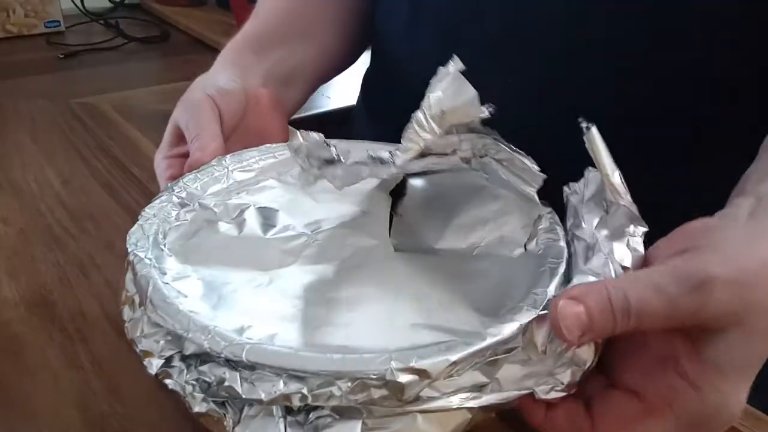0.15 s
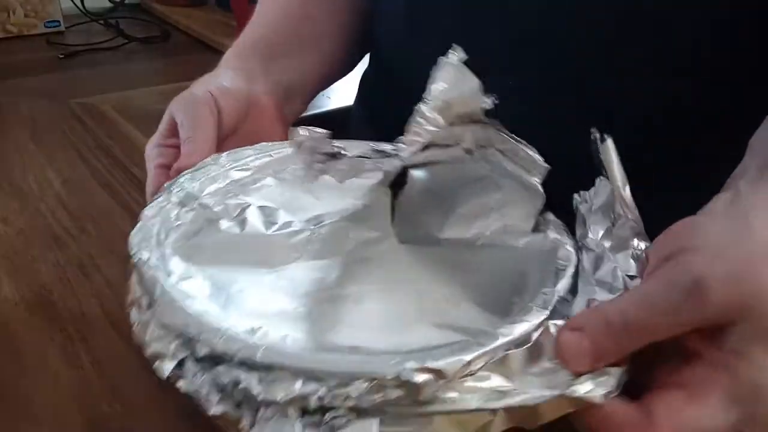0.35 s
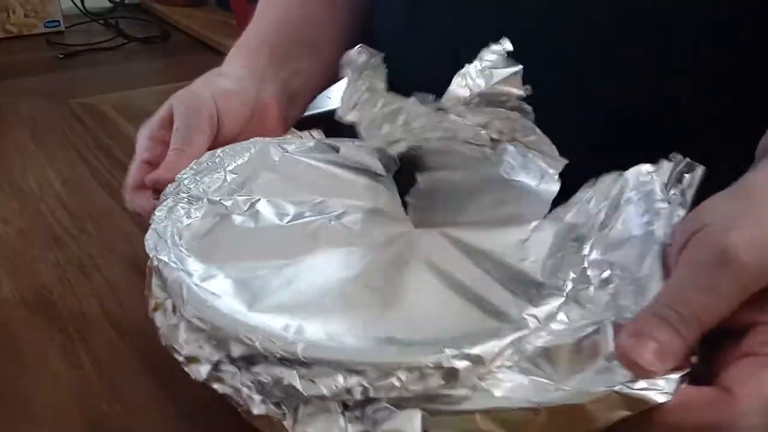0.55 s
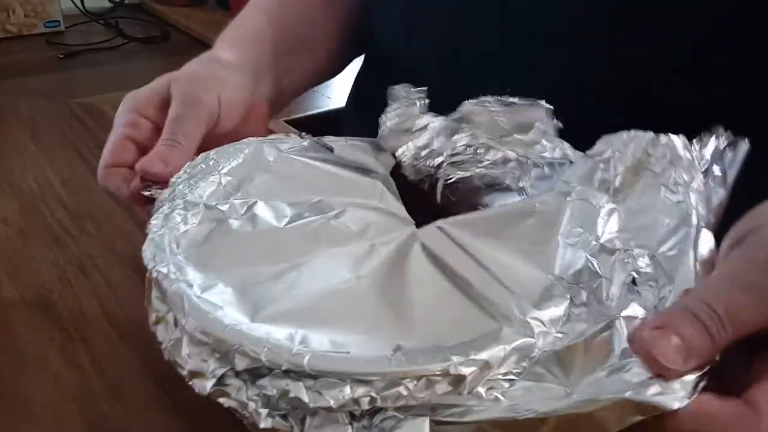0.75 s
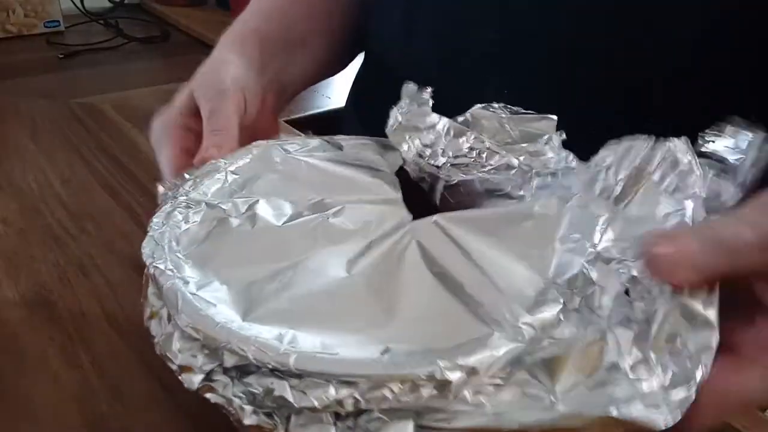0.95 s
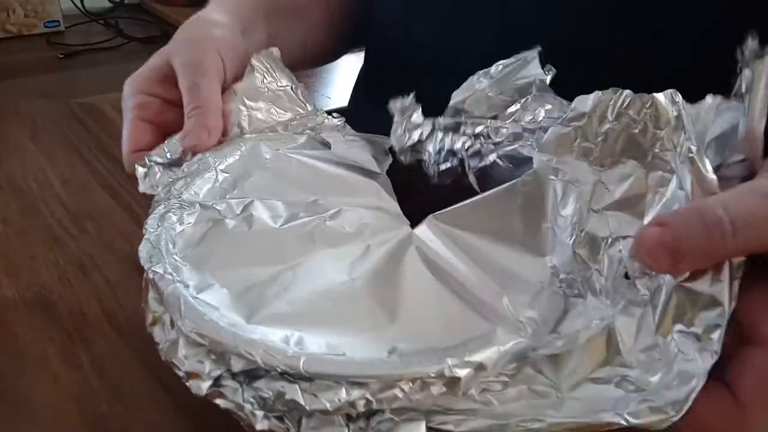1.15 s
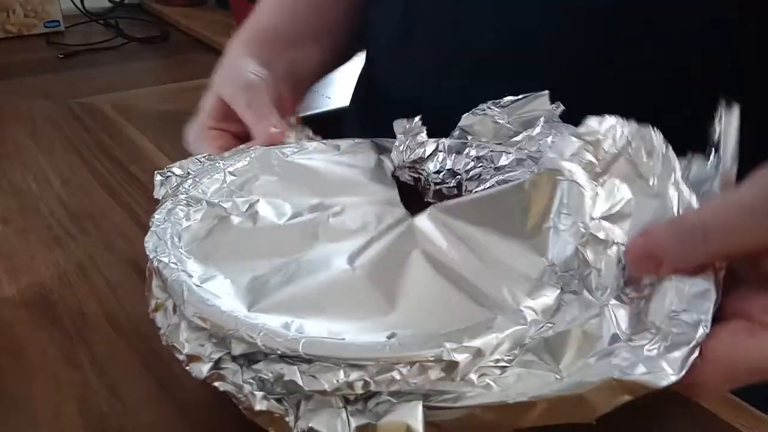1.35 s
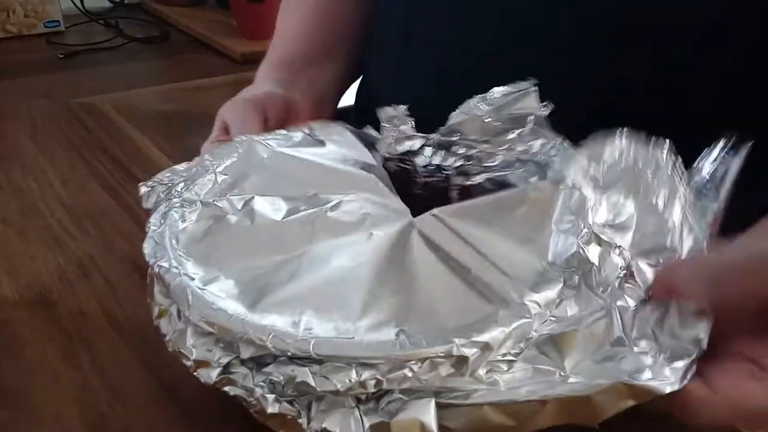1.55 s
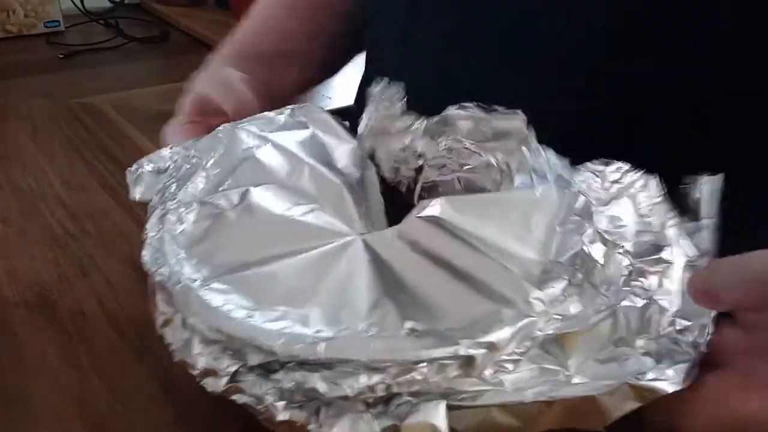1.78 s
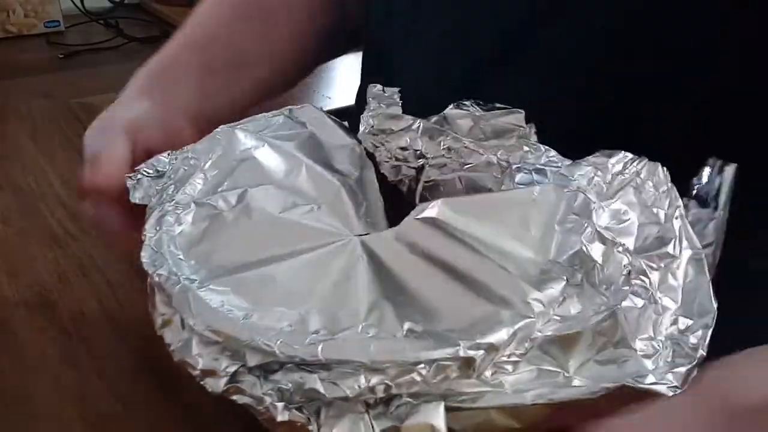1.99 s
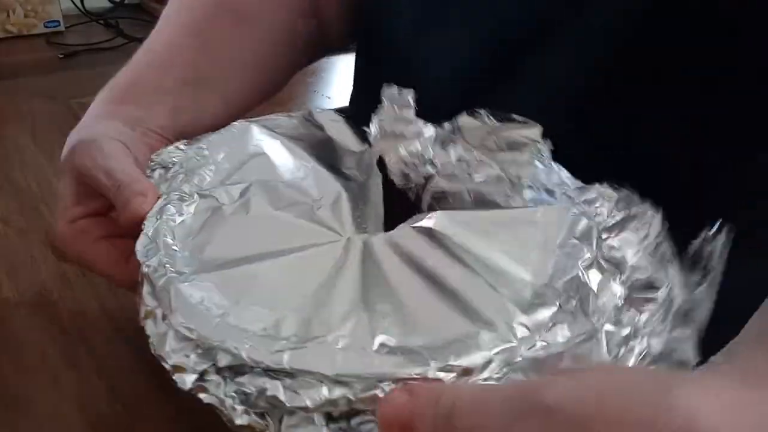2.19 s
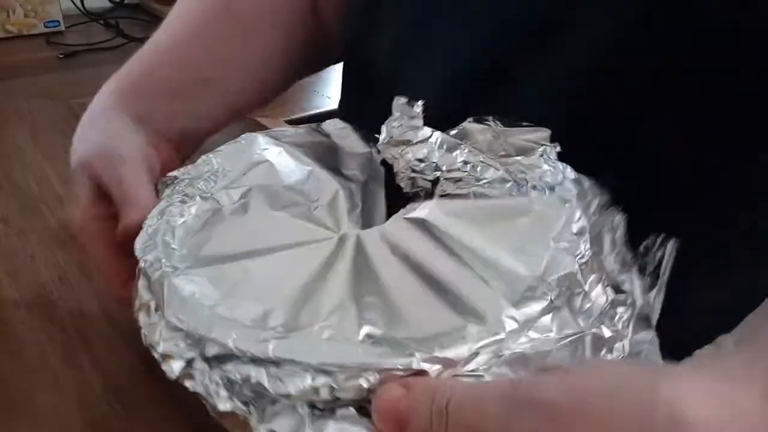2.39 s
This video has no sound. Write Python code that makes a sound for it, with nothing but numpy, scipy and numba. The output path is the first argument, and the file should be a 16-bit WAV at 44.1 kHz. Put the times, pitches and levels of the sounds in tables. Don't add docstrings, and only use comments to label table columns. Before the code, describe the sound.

Aluminium foil is peeled and crumpled off a bowl, starting almost silent, then bursting into dense bright crackles and sharp snaps, with short drum-like booms and soft thuds, close to a phone microphone in a small kitchen.

```python
import sys
import numpy as np
from scipy import signal
from scipy.fft import rfft, irfft
from scipy.io import wavfile
from numba import njit

SR = 44100
rng = np.random.default_rng(int(sys.argv[2]) if len(sys.argv) > 2 else 0)


def gain_from_decibels(decibels):
    exponent = np.asarray(decibels, float) / 20
    return 10 ** exponent


def waveform_to_disk(signal):
    frames = np.transpose(np.atleast_2d(signal))
    scaled = np.clip(frames, -1, 1) * 32767
    samples = np.round(scaled).astype(np.int16)
    wavfile.write(sys.argv[1], SR, samples)


N = 107074


def curve(table, hz):
    return np.interp(np.log(hz), np.log(np.array(table)[:, 0]), np.array(table)[:, 1])


def unit(x):
    return x / np.sqrt(np.mean(x ** 2))


def shape(t, start, hold, attack, release):
    rise = np.clip((t - start) / attack, 0, 1)
    return rise * np.exp(-np.maximum(t - start - hold, 0) / release)


@njit
def rings(n, at, turn, fade, size):
    out = np.zeros(n)
    for g in range(len(at)):
        step = np.exp(1j * turn[g] - fade[g])
        z = size[g] + 0j
        for i in range(int(at[g]), min(n, int(at[g] + 5 / fade[g]))):
            z *= step
            out[i] += z.imag
    return out


def ring(s, hz, cycles, size):
    hz = np.clip(hz, 60, .45 * SR).ravel()
    at = np.maximum(s.ravel() * SR, 0)
    fade = np.pi * hz / (cycles.ravel() * SR)
    return rings(N, at, 2 * np.pi * hz / SR, fade, size.ravel())


BUCKLES_PER_S, PARTIALS = 5000, 4
BUCKLE_SCATTER_DB, SURGE_DB, BUCKLE_SPREAD_S = 0.4, 0.54, .0007
BUCKLE_CYCLES, BUCKLE_RING_SPREAD = 7.1, 0.52
PULL_ATTACK_S, PULL_RELEASE_S = 0.0029, .013
# frequency in Hz, level in dB per Hz.
FOIL = [(90, -81), (280, -4.5), (700, -4), (2000, -1.5), (4600, -0.5), (7000, -1.5), (9000, -11),
        (15500, -8)]
# start in seconds, hold in seconds, level in dB, brightness in dB per octave.
PULLS = [(0.134, 0.09, -48.5, -1), (0.211, 0.045, -42, -1), (0.271, 0.042, -31, 1), (0.303, 0.065, -29, 0),
         (0.376, 0.035, -28, 2), (0.429, 0.021, -24.5, 3.5), (0.45, .04, -21.5, 1.5),
         (0.501, 0.022, -23.5, 3.5), (0.532, 0.085, -30, 0), (0.232, 0.028, -39, 4),
         (0.641, 0.049, -24.5, 1.5), (0.73, 0.044, -31.5, -1.5), (0.753, 0.076, -29.5, 0),
         (0.868, 0.046, -27, -0.3), (0.925, 0.035, -24.5, 2), (0.965, 0.038, -23, 1.3),
         (1.014, 0.011, -25.5, 3), (1.036, 0.058, -26, -0.5), (1.108, 0.034, -33, 1),
         (1.168, 0.044, -31.5, 0.5), (1.197, 0.042, -23.5, 2), (1.248, 0.044, -24, 0.8),
         (1.3, 0.053, -36.5, -2), (1.365, 0.068, -30.5, -.1), (1.409, 0.064, -23.5, 2),
         (1.493, 0.074, -27, 1), (1.553, 0.024, -30, 9), (1.574, 0.059, -25.5, 2.5),
         (1.646, 0.031, -28.5, 3.8), (1.671, 0.022, -26, 0.2), (1.703, 0.082, -25, 0.3),
         (1.796, 0.034, -24.5, -1), (1.838, 0.045, -39, -3), (1.906, 0.032, -43.5, -0.5),
         (1.969, 0.034, -35.5, 0.1), (2.016, 0.038, -43, -3), (2.04, 0.033, -33, 0.5),
         (2.069, 0.02, -23, 1.5), (2.114, 0.084, -31, 2.5), (2.191, 0.054, -29, -1), (2.259, 0.18, -34, 0),
         (2.356, 0.058, -28, -0.3)]


def crumple():
    count = BUCKLES_PER_S * N // SR
    s = rng.uniform(0, N / SR, (count, 1))
    hz = 90 * (16000 / 90) ** rng.uniform(0, 1, (count, PARTIALS)) ** .5

    surge = np.repeat(rng.standard_normal(N // 200 + 1), 200)[(s * SR).astype(int)]
    buckle_db = BUCKLE_SCATTER_DB * rng.exponential(1, (count, 1)) + SURGE_DB * surge
    size = gain_from_decibels(buckle_db) * rng.standard_normal(hz.shape)
    cycles = BUCKLE_CYCLES * np.exp(BUCKLE_RING_SPREAD * rng.standard_normal(hz.shape))

    size = size * gain_from_decibels(curve(FOIL, hz)) * hz / np.sqrt(cycles * np.log(hz / 89))
    energy = size ** 2 * cycles * SR / (4 * np.pi * hz)
    size = size / np.sqrt(np.sum(energy) / N)
    s = s + BUCKLE_SPREAD_S * np.abs(rng.standard_normal(hz.shape))

    pull_power = 0
    for start, hold, db, tilt in PULLS:
        force = shape(s, start, hold, PULL_ATTACK_S, PULL_RELEASE_S)
        pull_power = pull_power + (gain_from_decibels(db + tilt * np.log2(hz / 4000)) * force) ** 2
    return ring(s, hz, cycles, size * np.sqrt(pull_power))


SNAP_SPREAD_S, SNAP_CYCLES, SNAP_WIDTH_OCT, CRACK_LOW_HZ = .0006, 12.4, .36, 1400
SNAP_DB, SNAP_TREBLE_DB, SNAP_WIDE_DB, SNAP_EDGE_DB = -11, 11, -6.5, 9


def creases(table, treble_db, lasts):
    s, db, pitch = table[:3]
    order = np.arange(60)
    chance = rng.standard_normal((len(s), 4, len(order)))
    share = (order + rng.uniform(0, 1, (len(s), len(order)))) / len(order)
    is_panel, is_spray = order % 3 == 0, order % 3 == 1

    offset = 2 * share - 1
    panel_hz = pitch * 2 ** (SNAP_WIDTH_OCT * offset)
    spray_hz = 8000 * (1 + share)
    crack_hz = CRACK_LOW_HZ + (8000 - CRACK_LOW_HZ) * share
    hz = np.where(is_panel, panel_hz, np.where(is_spray, spray_hz, crack_hz))

    panel_db = -SNAP_EDGE_DB * offset ** 2
    part_db = np.where(is_panel, panel_db, np.where(is_spray, treble_db + SNAP_TREBLE_DB, SNAP_WIDE_DB))
    gain_db = db + SNAP_DB + part_db + chance[:, 3]
    cycles = SNAP_CYCLES * np.sqrt(hz / 4000) * np.exp(0.2 * chance[:, 1])
    late = SNAP_SPREAD_S * chance[:, 2] ** 2 + lasts * rng.uniform(0, 1, share.shape)
    return ring(s + late, hz, cycles, gain_from_decibels(gain_db) * np.sign(chance[:, 1]))


RUN_TREBLE_DB, RUN_DB = -12.5, 2
# time in seconds, peak in dB, panel pitch in Hz, treble share in dB.
SNAPS_EARLY = [(0.0946, -47, 7800, -8), (0.197, -27, 10400, -18), (0.2494, -23, 7800, -19),
               (0.2624, -13, 5030, -11.5), (0.3035, -18, 2190, -20), (0.3131, -8, 4350, -24),
               (0.384, -14.5, 12500, -7), (0.3903, -9.5, 4740, -11.5), (.422, -19, 4950, -14),
               (0.4457, -9, 2780, -17), (.4578, -13, 4460, -16), (0.472, -14, 6800, -10),
               (.482, -18, 4970, -4), (.5475, -16, 5200, -23), (.659, -12.5, 4760, -22),
               (.787, -20, 2600, -20), (0.8774, -15, 7240, -13), (.991, -25, 794, -23),
               (1.0135, -16, 6540, -23), (1.075, -22, 1850, -23), (1.09, -22, 2100, -17),
               (0.5666, -13.5, 13900, -6.5), (0.5711, -12, 4750, -19), (0.6, -18, 4460, -10),
               (0.6398, -12.5, 1990, -7.5), (0.7179, -8, 7260, -20), (.7625, -17.5, 7000, -7),
               (0.9666, -9.5, 2140, -25), (.967, -13.5, 1180, -28), (1.021, -16, 7400, -7),
               (1.044, -13.5, 3300, -24), (1.0613, -7.5, 5500, -27), (1.1174, -11.5, 4420, -23),
               (1.1247, -6.5, 5500, -28), (1.1739, -13.5, 4330, -12)]
SNAPS_LATE = [(1.184, -18, 3000, -15), (1.2028, -17, 4500, -14), (1.2503, -21, 2620, -11),
              (1.376, -19, 2800, -25), (1.3905, -14.5, 4730, -18), (1.544, -15, 4970, -20),
              (1.654, -17.5, 6500, -14), (1.9803, -30, 5750, -18.5), (2.082, -18.5, 6230, -10.5),
              (2.171, -21, 4000, -20), (2.225, -24, 6000, -4), (1.808, -17.5, 915, -30),
              (1.237, -25, 3080, -4), (1.2598, -11.5, 3980, -19), (1.3288, -13, 5400, -10.5),
              (1.3626, -13.5, 4840, -14), (1.49, -9.5, 3700, -17), (1.504, -12, 5300, -13),
              (1.552, -19, 7300, -23), (1.68, -22, 4900, -0.5), (1.712, -13, 5400, -11),
              (1.7996, -9, 2020, -40), (1.8057, -9, 3880, -26), (2.0536, -23, 5000, -15),
              (2.0768, -28, 6060, -32), (2.0872, -15.5, 5400, -21), (2.1175, -13, 5540, -15),
              (2.1818, -18, 3100, -8), (2.2397, -15.5, 4670, -14), (2.2813, -30, 3500, -2),
              (2.303, -13.5, 4250, -14), (2.3061, -5, 5630, -18), (2.3645, -26, 1400, -17)]
# start in seconds, level in dB, pitch in Hz, length in seconds.
RUNS = [(.334, -7, 3480, .012), (.316, -16, 4500, 0.0054), (.489, -14, 3630, .006),
        (1.457, -13.5, 4200, .008), (1.582, -19, 4440, .01), (1.604, -17, 2980, .008),
        (1.619, -15.5, 5900, .006), (1.507, -12.5, 5460, .01), (1.231, -16, 4550, .008),
        (.431, -15, 7050, .007), (.508, -13.5, 6200, .01), (.668, -14, 4340, 0.013),
        (0.877, -12.5, 6360, 0.012), (.938, -12, 3880, .014), (1.273, -17.5, 1460, 0.0049),
        (1.414, -11.5, 4500, 0.011), (1.428, -11.5, 3400, 0.0078), (1.742, -17.5, 1360, .012),
        (1.817, -16, 3470, 0.013), (2.147, -15.5, 5740, 0.0065), (2.2, -14.5, 2970, .013),
        (2.355, -16, 2800, 0.0073), (2.419, -11, 5400, 0.0091)]


def snaps():
    single = np.array(SNAPS_EARLY + SNAPS_LATE).T[:, :, None]
    runs = np.array(RUNS).T[:, :, None]
    return creases(single, single[3], 0) + gain_from_decibels(RUN_DB) * creases(runs, RUN_TREBLE_DB, runs[3])


FLEX_ATTACK_S, FLEX_RELEASE_S = 0.0049, .025
SKIN_CYCLES, SKIN_BEND_OCT, SKIN_FOCUS_DB = 42.6, .015, 26
# frequency in Hz, level in dB.
SKIN = [(280, 2.5), (375, -1.5), (480, -4.5), (630, 7), (715, 8.5), (810, 7.5)]
# start in seconds, hold in seconds, level in dB,
# pitch of the part that moves most in Hz.
FLEXES = [(0.285, 0.081, -44, 520), (0.465, 0.046, -37.5, 627), (0.549, 0.032, -43, 600),
          (0.706, 0.0126, -25, 554), (0.736, 0.039, -37, 626), (0.934, 0.061, -37, 715),
          (1.057, .05, -38.5, 745), (1.202, 0.01524, -32, 616), (1.24, 0.068, -38.5, 500),
          (1.409, 0.045, -37, 720), (1.485, 0.049, -41, 640), (1.567, .05, -31, 394),
          (1.586, .03, -37.5, 740), (1.667, .1, -41, 754), (1.826, 0.053, -47, 710),
          (1.978, .04, -44.5, 740), (2.08, 0.025, -42, 727), (2.179, .04, -41, 684),
          (2.326, 0.064, -45.5, 382)]


def skin():
    start, hold, db, centre_hz = np.array(FLEXES).T[:, :, None]
    share = rng.uniform(0, 1, (len(start), 120))
    chance = rng.standard_normal((len(start), 2, 120))
    mode_hz, mode_db = np.tile(np.array(SKIN).T, 20)
    span = hold + 3 * FLEX_RELEASE_S
    s = start + span * share
    hz = mode_hz * 2 ** (SKIN_BEND_OCT * chance[:, 0])
    gain_db = db + mode_db - SKIN_FOCUS_DB * np.abs(np.log2(hz / centre_hz))
    force = shape(s, start, hold, FLEX_ATTACK_S, FLEX_RELEASE_S)
    size = gain_from_decibels(gain_db) * force * np.sqrt(span / .5) * chance[:, 1]
    return ring(s, hz, SKIN_CYCLES + 0 * hz, size)


KNOCK_CYCLES = 4.2
# time in seconds, level in dB, pitch in Hz.
KNOCKS = [
    (0.371, -35.5, 280),
    (1.804, -52, 140),
    (2.032, -43.5, 274),
    (2.074, -43, 303),
    (.67, -49, 292),
    (0.93, -40, 300),
    (1.421, -40.5, 307),
    (2.416, -51.5, 149),
]


def knocks():
    s, db, pitch = np.array(KNOCKS).T[:, :, None]
    chance = rng.standard_normal((len(s), 2, 6))
    hz = pitch * 2 ** (.5 * chance[:, 0] * (np.arange(6) > 1))
    late = 0.00604 * np.abs(chance[:, 1])
    return ring(s + late, hz, KNOCK_CYCLES + 0 * hz, gain_from_decibels(db) + 0 * hz)


def tail(x, t60, t60_top, delay, size):
    t, hop = np.arange(size) / SR, 512
    blocks = np.pad(x, (0, -N % hop)).reshape(-1, hop)
    noise = rng.standard_normal((len(blocks), size))
    low = signal.sosfilt(signal.butter(1, 7000, fs=SR, output="sos"), noise)
    response = low * gain_from_decibels(-60 * t / t60) + (noise - low) * gain_from_decibels(-60 * t / t60_top)
    response = response * np.clip(t / delay, 0, 1)
    response = response / np.sqrt(np.mean(np.sum(response ** 2, axis=1)))
    wet = signal.fftconvolve(blocks, response, axes=1)
    at = np.arange(len(blocks))[:, None] * hop + np.arange(wet.shape[1])
    return np.bincount(at.ravel(), wet.ravel())[:N]


AIR_DB, AIR_TILT_DB = -61, -2
RUMBLE_HZ, RUMBLE_DB = 130, -77.5


def air():
    hz = np.maximum(np.fft.rfftfreq(N, 1 / SR), 20)

    def noise(db):
        return unit(irfft(rfft(rng.standard_normal(N)) * gain_from_decibels(db), N))

    hush = noise(curve(FOIL, hz) + AIR_TILT_DB * np.log2(hz / 4000))
    rumble = noise(-9 * np.abs(np.log2(hz / RUMBLE_HZ)))
    return gain_from_decibels(AIR_DB) * hush + gain_from_decibels(RUMBLE_DB) * rumble


SHEET_CUT_HZ = 326
SHIMMER_DB, SHIMMER_T60_S = -9, 0.033
ROOM_DB, ROOM_T60_S, ROOM_T60_TOP_S, ROOM_DELAY_S = -9.5, .45, .36, .01


def scene():
    small_sheet = signal.butter(2, SHEET_CUT_HZ, "highpass", fs=SR, output="sos")
    foil = signal.sosfilt(small_sheet, crumple() + snaps() + skin())
    shimmer = gain_from_decibels(SHIMMER_DB) * tail(foil, SHIMMER_T60_S, SHIMMER_T60_S, 0.0029, size=4096)
    near = foil + shimmer + knocks()
    room = gain_from_decibels(ROOM_DB) * tail(near, ROOM_T60_S, ROOM_T60_TOP_S, ROOM_DELAY_S, size=14000)
    return (near + room + air())[None]


def low_pass(x):
    return signal.sosfilt(signal.butter(12, 16840, fs=SR, output="sos"), x)


LOW_CUT_HZ, TOP_HZ = 140, 15900
# time in seconds, gain in dB.
GATE = [(0, 15.5), (.0035, 9), (.0045, -16), (.02, -38), (.03, -52), (.046, -38), (.058, -15), (.064, -3)]


def record(dry):
    gate = gain_from_decibels(np.interp(np.arange(N) / SR, *np.array(GATE).T))
    low_cut = signal.butter(2, LOW_CUT_HZ, "highpass", fs=SR, output="sos")
    top_cut = signal.ellip(10, .2, 60, TOP_HZ, fs=SR, output="sos")
    gated = signal.sosfilt(low_cut, dry) * gate
    mix = signal.sosfilt(top_cut, gated)
    return low_pass(mix)


dry = scene()
out = record(dry)
waveform_to_disk(out)
```